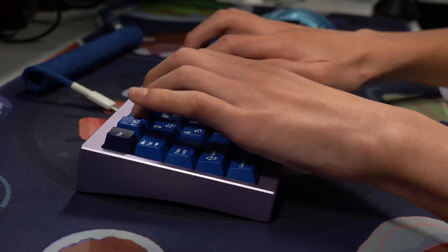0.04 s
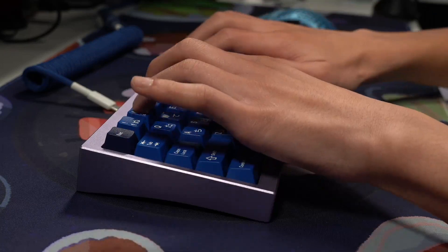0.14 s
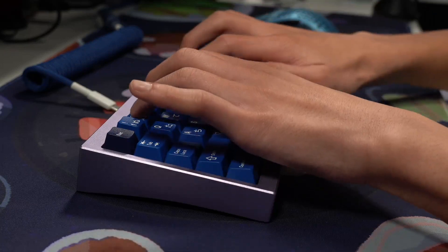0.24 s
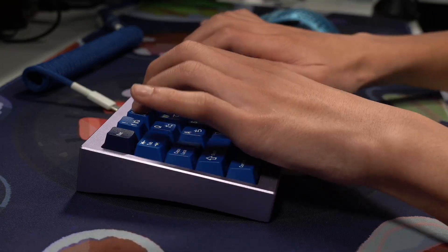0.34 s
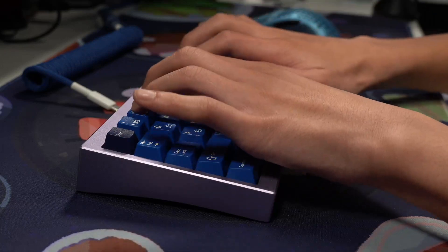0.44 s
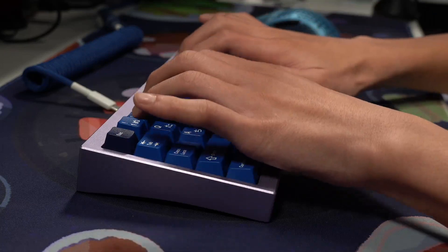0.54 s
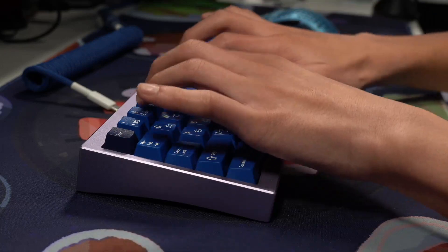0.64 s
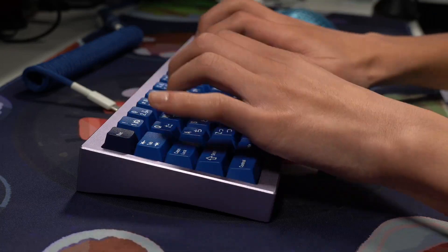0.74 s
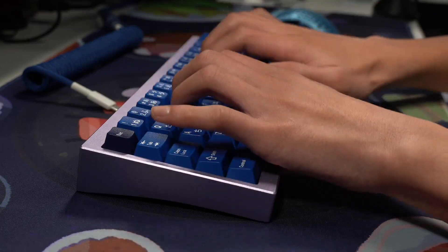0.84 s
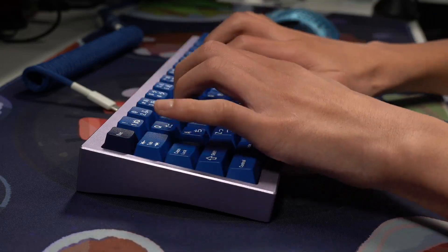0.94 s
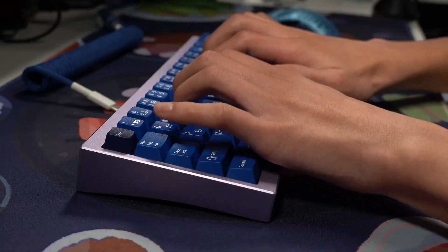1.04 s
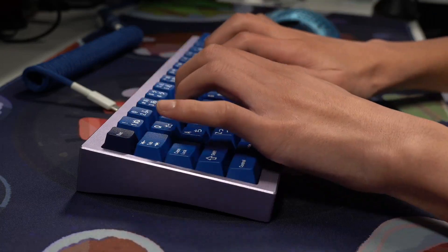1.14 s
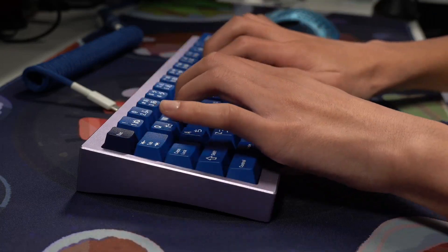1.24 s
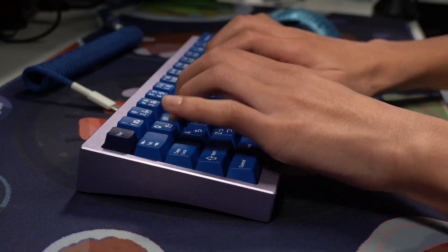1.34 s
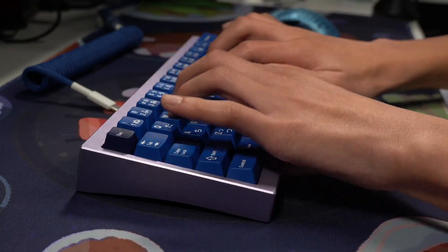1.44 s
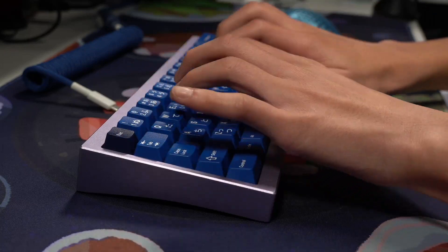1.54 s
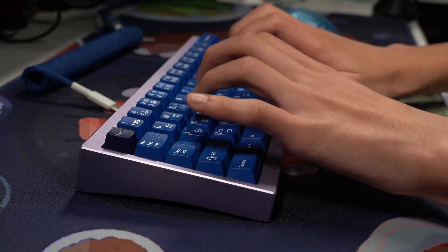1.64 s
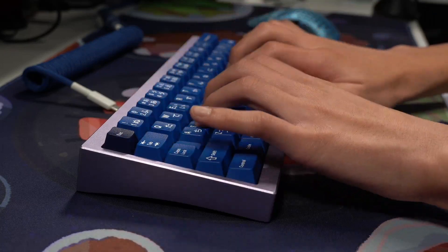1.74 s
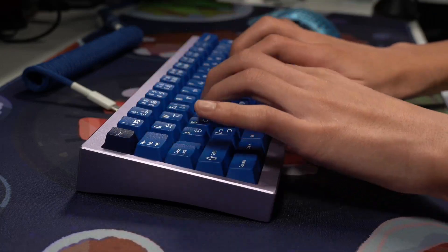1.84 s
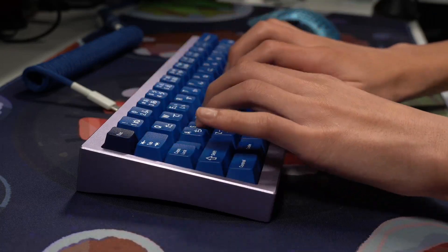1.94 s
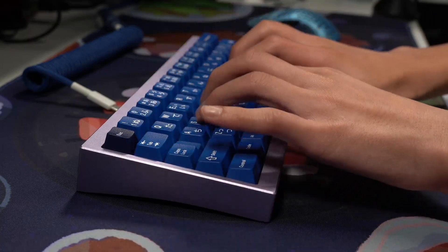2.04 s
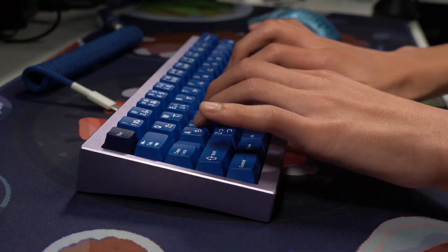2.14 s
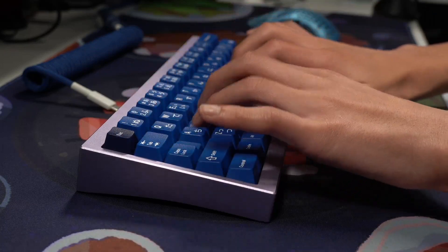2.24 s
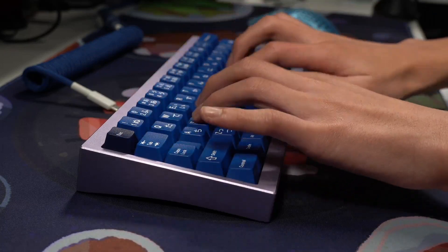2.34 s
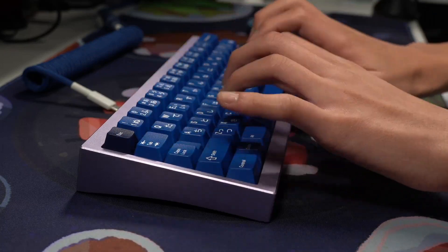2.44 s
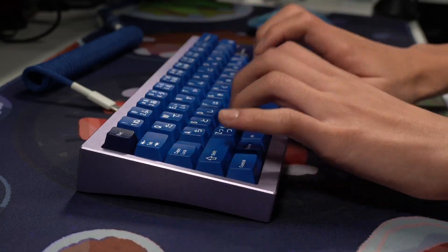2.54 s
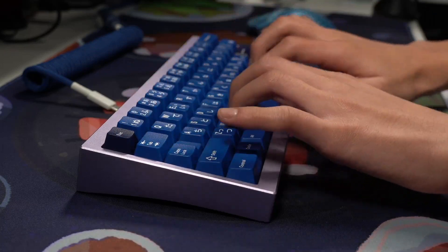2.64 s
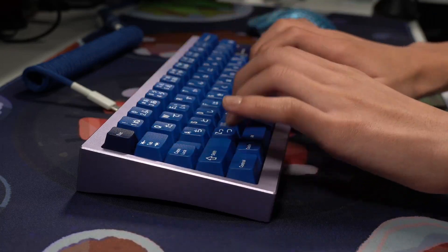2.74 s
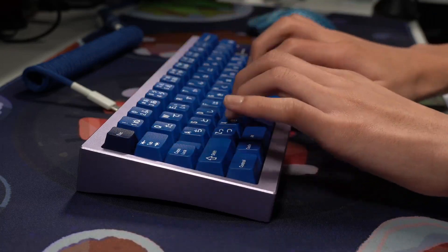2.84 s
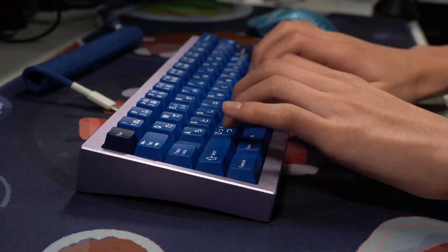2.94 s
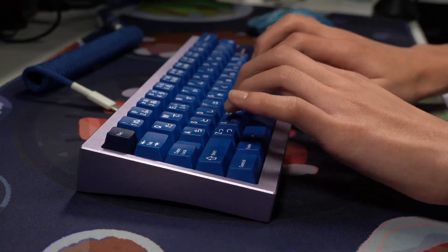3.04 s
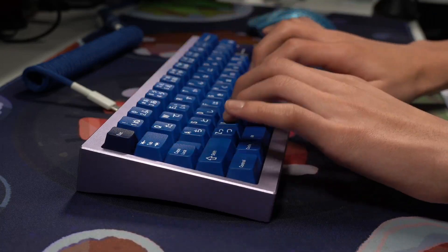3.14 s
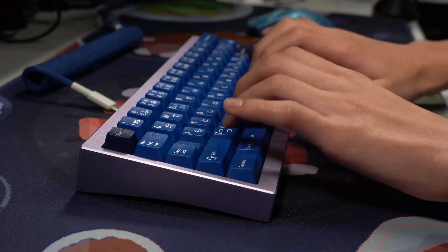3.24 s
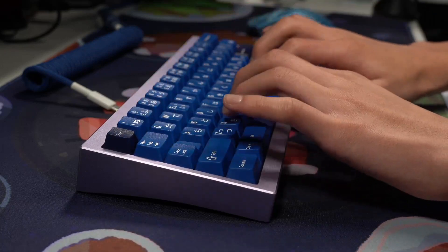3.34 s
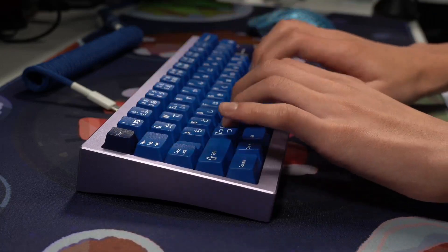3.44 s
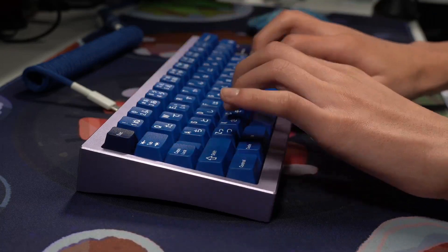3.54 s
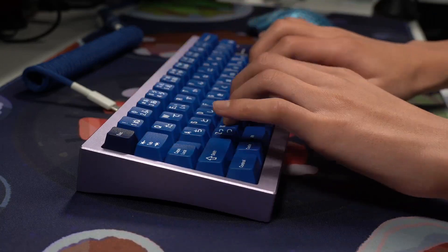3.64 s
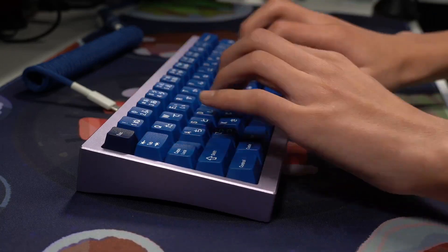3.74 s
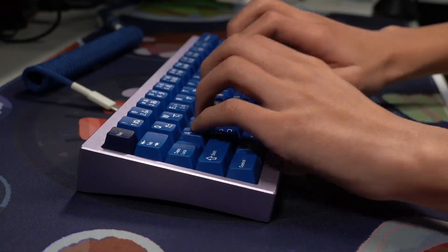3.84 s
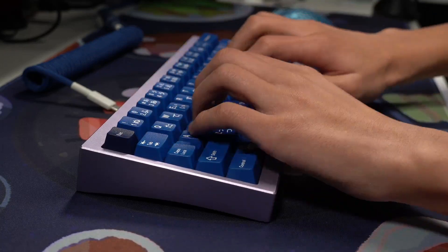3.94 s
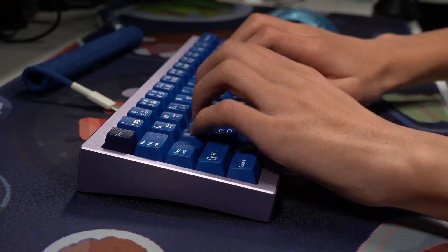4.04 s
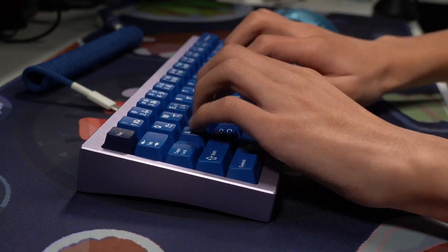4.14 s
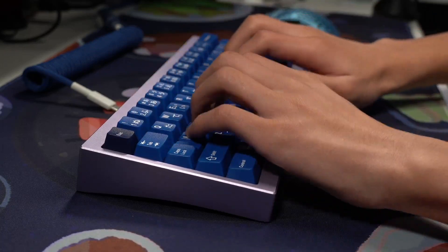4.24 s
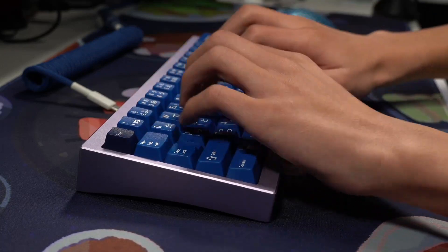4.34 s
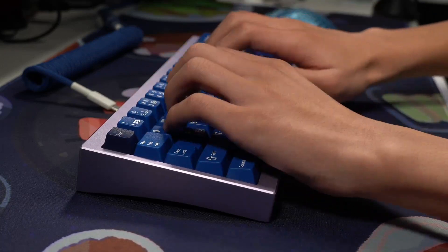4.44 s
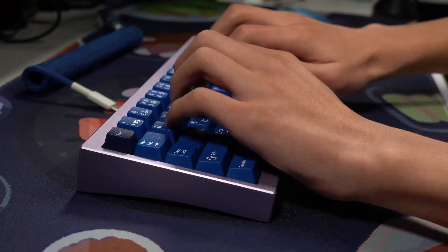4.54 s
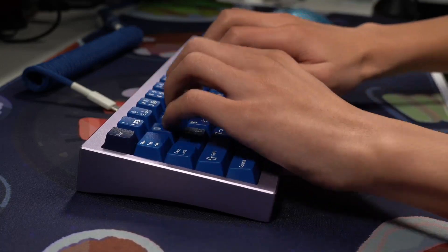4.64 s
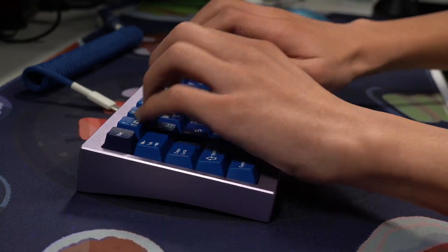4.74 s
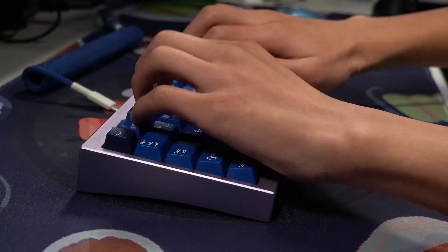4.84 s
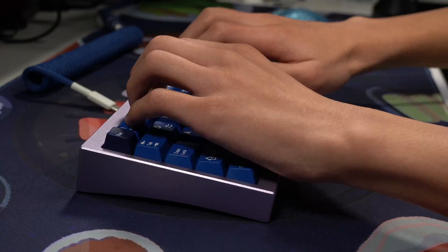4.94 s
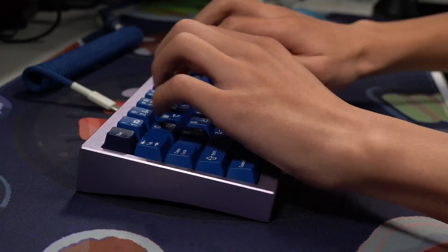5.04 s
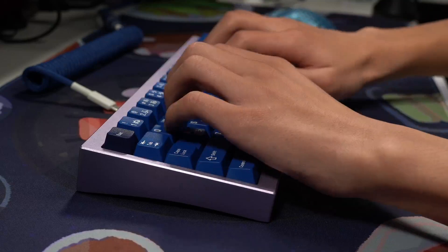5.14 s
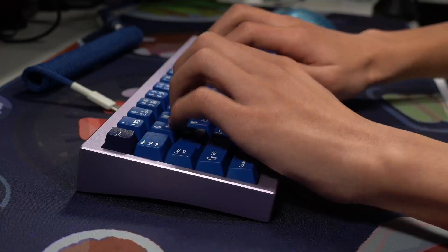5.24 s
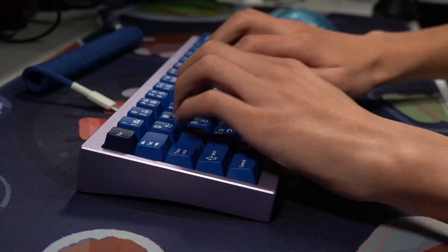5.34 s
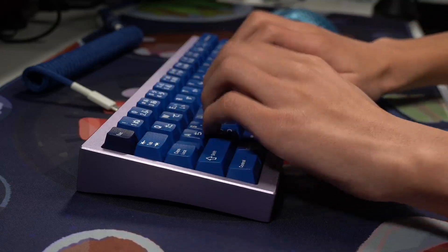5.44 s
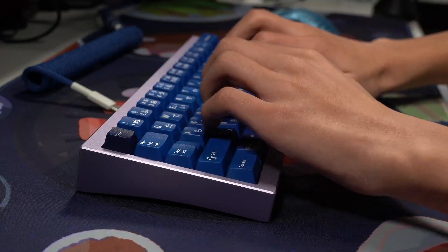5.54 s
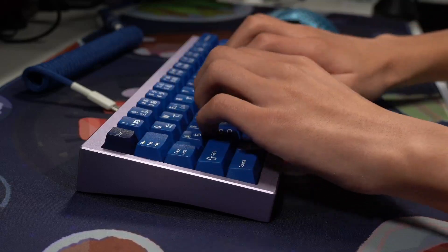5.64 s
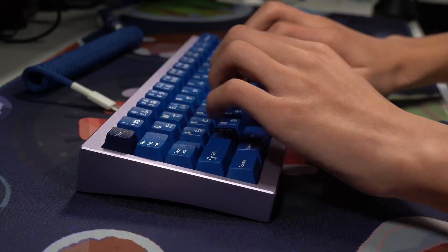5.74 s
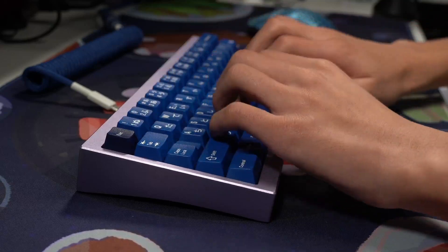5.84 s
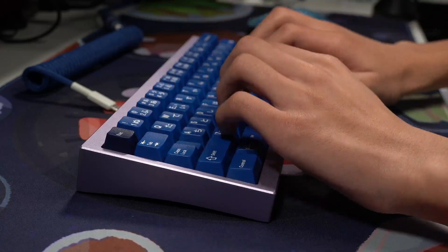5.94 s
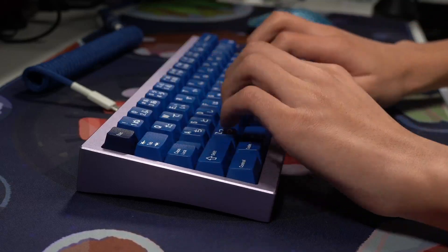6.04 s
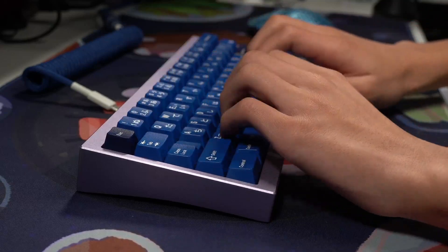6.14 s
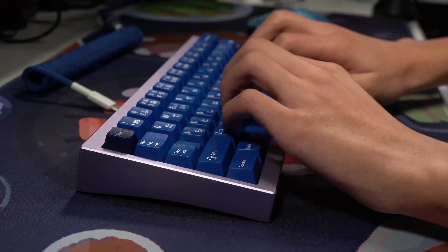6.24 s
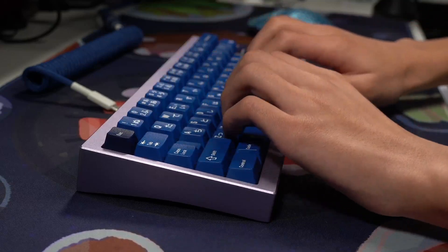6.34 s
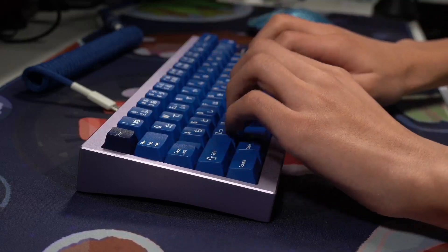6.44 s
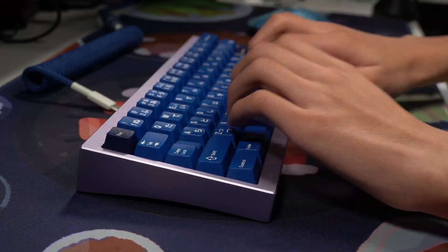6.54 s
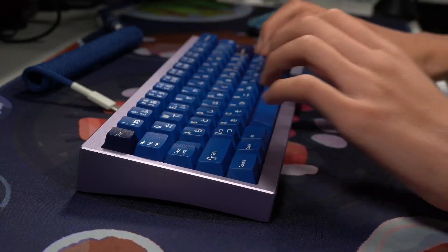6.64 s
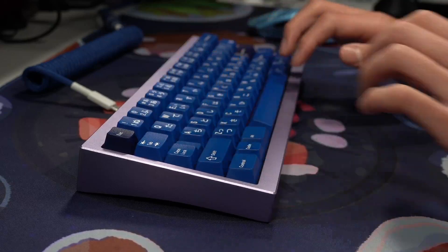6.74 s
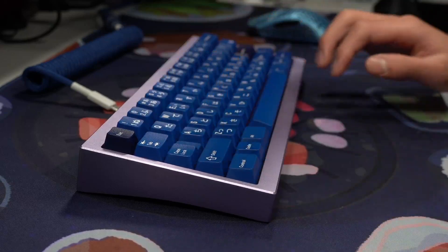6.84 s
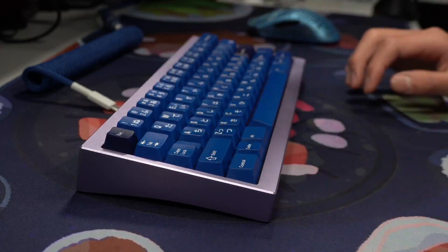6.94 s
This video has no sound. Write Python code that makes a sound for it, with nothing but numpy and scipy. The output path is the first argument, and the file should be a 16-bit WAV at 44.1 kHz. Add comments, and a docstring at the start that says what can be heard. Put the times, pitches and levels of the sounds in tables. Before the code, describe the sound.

Close-up rapid keystrokes clatter on a metal-cased mechanical keyboard, with low desk thumps beneath, then stop as the hands lift away.

```python
"""Fast typing on a mechanical keyboard in a metal case on a desk mat, over steady faint hum and room air.
Hard, bright presses mix with softer, hollow releases and light taps: blows ringing plate, cap and stem modes.
Key colour changes as the hands move over the board. Loose caps tick; case and room add decaying noise tails.
Presses boom the desk as decaying sines, releases less; sliding and rocking are shaped noise.
A soft noise rustle swells at the end as the hands leave the keys."""
import sys
import numpy as np
from scipy import signal
from scipy.fft import rfft, irfft
from scipy.io import wavfile
from scipy.ndimage import uniform_filter1d

SR = 44100
rng = np.random.default_rng(int(sys.argv[2]) if len(sys.argv) > 2 else 0)


def unload_audio(sound):
    """Save the sound as a 16-bit wav file, at the path given as the first command line argument."""
    columns = np.transpose(np.atleast_2d(sound))
    # keep every value between -1 and 1, then stretch to whole-number steps
    steps = np.round(np.clip(columns, -1, 1) * 32767)
    wavfile.write(sys.argv[1], SR, steps.astype(np.int16))


N = 308259
TIME_S = np.arange(N) / SR

# room air: (frequency [Hz], relative density [dB per Hz])
AIR = [(10, -25.5), (30, -2.5), (70, -1.5), (105, -10.5), (290, -10.5), (650, -28.5), (1500, -35),
       (4000, -43)]
# steady hum: (frequency [Hz], rms level [dB])
HUM = [(96.9, -57), (113.8, -57), (150.9, -61), (263.8, -68), (318.6, -62), (425.8, -72), (560.4, -68),
       (963, -72)]
# fingers sliding on caps, stems in housings: (frequency [Hz], relative density [dB per Hz])
RUB = [(500, -9), (1200, -3), (2900, 0), (4500, -5), (8000, -17), (11000, -14), (13000, -23)]
# case rocking on its mat: (frequency [Hz], relative density [dB per Hz])
ROCK = [(15, -14.5), (36, 2.5), (230, -7.5), (900, -46.5)]
# keys under the fingers: (from time [s], plate [Hz], cap [Hz], cap wall [Hz], stem [Hz],
# plate [dB re cap], cap wall [dB re cap], stem [dB re cap])
KEYS = [(0.0, 1115, 2570, 3300, 12700, -5, -10.5, -10), (0.68, 1360, 2860, 3545, 11100, -10.5, -5, -7),
        (1.55, 1970, 2950, 3620, 10600, -4.5, -6.5, -7.5), (2.4, 1530, 2550, 3120, 11230, -0.5, 3.5, -0.5),
        (3.7, 1720, 3700, 2890, 10760, -3.5, 3.5, -2), (4.3, 1330, 2720, 3570, 11100, -14.5, -10, -11),
        (4.65, 950, 2370, 2910, 12200, -6.5, -27, -12.5), (4.99, 1200, 2650, 3740, 10950, -9, -8, -6.5),
        (5.33, 1620, 2700, 2790, 10540, -10, 7.5, -1.5), (5.68, 1470, 2570, 2830, 11200, 6, 12, 5.5)]
# resonance widths at average force: plate, cap, cap wall, stem [Hz]
WIDTHS_HZ = [425, 600, 1100, 800]
# colour of a plastic-on-plastic blow: (frequency [Hz], level [dB])
BLOW = [(100, -23), (700, 0), (2000, 5), (4500, 3.5), (7000, 0.5), (11000, -3), (12700, -7), (15000, -7)]
# hollow clacks, mostly caps springing back on their top stop:
# (time [s], level over 3 ms [dB], hollowness: extra plate sound, capped at 10 in the colour [dB])
RELEASES = [(0.022, -24, 6.5), (0.1779, -18, -4), (0.3603, -19.0, 0.5), (0.5386, -25, 10),
            (0.5654, -24, -4), (0.582, -25.5, -0.5), (0.7328, -19.5, -10.5), (0.8214, -26, 5),
            (0.9156, -20, -2), (1.0539, -22, -0.5), (1.0694, -23.5, 2), (1.097, -16.5, -1),
            (1.2345, -22, 1), (1.2791, -13, 0), (1.3695, -19, 4.5), (1.3993, -24.5, 6), (1.6315, -18.5, -2),
            (1.7327, -24.5, 17.5), (1.8284, -13, 1), (1.9087, -23.5, 6), (2.0048, -16.5, -1),
            (2.0542, -26, 1), (2.0858, -24, 9.5), (2.1919, -21.5, -1), (2.2283, -25.5, 6),
            (2.2412, -24.5, 2), (2.5539, -18, 12), (2.5757, -19.5, 6), (2.6193, -25.5, 4), (2.7218, -17, 5),
            (2.7827, -24.5, 12), (2.8944, -21.5, 1), (2.9136, -20.5, 16), (2.9504, -23.5, 7.5),
            (3.0395, -17, 1), (3.052, -17, 2), (3.1092, -26.5, 16), (3.118, -32, -9), (3.2229, -16.5, 5.5),
            (3.2362, -26, 10), (3.2855, -25, 5), (3.2945, -23.5, 6), (3.451, -23.5, 7), (3.5683, -24, 26),
            (3.5945, -20.5, 0.5), (3.6319, -27.5, 14), (3.639, -20, -5), (3.9269, -24.0, 1),
            (3.998, -23.5, -4), (4.0364, -19, -2), (4.0543, -19.5, 4.5), (4.216, -20, 2),
            (4.2243, -21.5, 9), (4.2377, -20.5, 5), (4.3293, -19.5, 6), (4.3418, -16, 1),
            (4.4372, -20.5, 5.5), (4.585, -20.5, 10), (4.6049, -23.5, -6), (4.773, -19.5, 4.5),
            (4.8178, -22.5, 1.5), (4.9092, -19.5, 9.5), (5.1034, -17.5, 7.5), (5.1342, -21, -3),
            (5.1908, -19, -3.5), (5.2489, -18.5, 2.5), (5.364, -18, 14), (5.37, -19, 11.5),
            (5.5861, -20, 0), (5.6022, -17.5, 15), (5.7191, -14, 4), (5.7347, -14.5, -7),
            (5.796, -19.5, 8.5), (5.9226, -23.5, 15), (5.9994, -28.5, 4), (6.1191, -18.5, 12),
            (6.2966, -24, 11), (6.4846, -25, 0)]
# fingertips tapping caps between strokes: (time [s], level over 3 ms [dB])
TOUCHES = [(0.067, -34.5), (0.209, -32.5), (0.239, -35), (0.697, -45.5), (0.88, -27), (1.012, -33),
           (1.185, -24.5), (1.684, -29.5), (1.925, -29.5), (1.965, -24.5), (2.747, -24), (2.796, -27),
           (3.065, -24), (3.084, -27), (3.249, -29), (3.414, -21.5), (3.471, -29.5), (3.73, -32.5),
           (3.773, -28), (3.822, -28), (3.893, -22), (4.302, -51), (4.415, -23), (4.454, -24.5),
           (4.72, -28), (5.451, -22.5), (5.816, -24), (6.017, -27.5), (6.177, -29), (6.195, -29),
           (6.343, -31), (6.357, -29.5), (6.452, -23.5)]
# hard clacks of keys bottoming out: (time [s], level over 3 ms [dB])
PRESSES = [(0.1015, -15), (0.1039, -17.5), (0.1898, -21.5), (0.2953, -19.5), (0.3351, -20), (0.405, -21),
           (0.4608, -18.0), (0.4888, -17), (0.724, -20.5), (0.7537, -15.5), (0.7861, -15.0),
           (0.9246, -20.5), (0.979, -13), (0.9836, -15.5), (1.0871, -31), (1.102, -19), (1.1432, -12.5),
           (1.1565, -12), (1.2652, -15.0), (1.2823, -14.5), (1.3248, -10.5), (1.3311, -13), (1.4176, -18.5),
           (1.6009, -24.5), (1.6228, -9.5), (1.6437, -6.5), (1.705, -17.5), (1.7766, -13.5), (1.8064, -15),
           (1.8354, -12), (1.8379, -19.5), (1.8728, -17.5), (1.9487, -13.0), (1.9772, -14.5), (2.0087, -16),
           (2.0223, -17.0), (2.0773, -22.5), (2.1378, -16), (2.1605, -12), (2.1776, -8.5), (2.2726, -17.5),
           (2.2926, -19.5), (2.4562, -21.0), (2.4722, -17.5), (2.4838, -13.5), (2.4969, -12.5),
           (2.6568, -18), (2.6696, -17.5), (2.6829, -15), (2.6885, -12), (2.8218, -15.0), (2.8558, -13),
           (2.8604, -15.5), (2.9993, -14.5), (3.0185, -15.0), (3.1651, -17.5), (3.1739, -15),
           (3.1805, -16.5), (3.2141, -14.5), (3.3259, -14.5), (3.3378, -13), (3.3483, -21), (3.3877, -15),
           (3.3897, -14.5), (3.4992, -14), (3.5186, -14), (3.5546, -14.5), (3.7874, -16.5), (3.8032, -13.5),
           (3.8373, -10.5), (3.8637, -20), (3.9705, -22.5), (3.9785, -15.5), (3.9888, -17), (4.016, -15.5),
           (4.0203, -21), (4.1235, -12.5), (4.1389, -11.5), (4.1441, -13.0), (4.149, -22.5), (4.1556, -12),
           (4.2018, -20.5), (4.2506, -25.5), (4.3475, -16), (4.3504, -14), (4.3571, -13.5), (4.397, -17.5),
           (4.5044, -7.5), (4.5115, -21), (4.5188, -9.5), (4.5403, -25.5), (4.5742, -16.0), (4.5918, -18.0),
           (4.688, -13.5), (4.6967, -13.5), (4.7413, -13), (4.7812, -23.0), (4.8577, -12), (4.8621, -20),
           (4.9168, -20.5), (4.9426, -21.5), (5.0226, -13), (5.0251, -5), (5.0359, -6.5), (5.0502, -5),
           (5.1864, -13.5), (5.1952, -12), (5.1988, -13.5), (5.2052, -17.5), (5.2191, -11.0),
           (5.2585, -17.5), (5.2883, -21.5), (5.3589, -8.5), (5.3748, -17.5), (5.3777, -10.0),
           (5.3841, -8.5), (5.4354, -15.5), (5.4907, -21), (5.5308, -13), (5.5338, -10), (5.5514, -17.5),
           (5.5621, -23.5), (5.6181, -22.5), (5.6346, -26.5), (5.7248, -25), (5.7283, -10.5),
           (5.7372, -19.0), (5.7498, -12.0), (5.8304, -18.5), (5.8951, -20.5), (5.9442, -19),
           (6.037, -19.0), (6.0455, -19), (6.0482, -13), (6.2163, -15.5), (6.2307, -16), (6.2368, -17),
           (6.2861, -18.5), (6.3938, -11.5), (6.3994, -13.0), (6.4203, -17.5), (6.4643, -25)]
# ring of the metal case: (frequency [Hz], t60 [s])
CASE = [(800, 0.023), (2800, 0.0067), (6000, 0.0099), (12000, 0.0084)]
# ring of the room: (frequency [Hz], t60 [s])
ROOM = [(300, 0.2), (2500, 0.2), (12000, 0.2)]
# modes of the desk: (frequency [Hz], relative level [dB], t60 [s])
DESK = [(75.5, -7, 0.11), (95.1, -3, 0.18), (110.3, -1, 0.09), (159, -17, 0.056), (220, -16.5, .08),
        (247.5, -13, 0.11)]
# how heavily the hands land: (time [s], desk thump re an average press clack [dB])
WEIGHT = [(0.1, -17), (0.9, -18.5), (1.35, -28), (1.65, -16.5), (2.2, -16), (2.55, -12.5), (3.45, -11),
          (3.85, -16), (4.4, -15.5), (5.0, -19.5), (5.5, -13), (6.1, -15.5), (6.45, -11.5)]
# hands leaving the keys: (time [s], share of full rustle [0-1])
LIFT = [(6.78, 0), (6.89, 1), (6.99, .9)]
# rustle colour: (frequency [Hz], relative density [dB per Hz])
RUSTLE = [(100, 2), (700, -4), (1700, -2), (8000, -17)]

AIR_DB, LIFT_DB = -50, -65  # rms levels; LIFT_DB at full rustle
AVERAGE_DB = -17  # reference stroke
PRESS_HOLLOW_DB, TOUCH_HOLLOW_DB, HOLLOW_SPREAD_DB = -5, 2.0, 0.5
HOLLOW_PER_DB = -0.17  # softer blows are hollower
EDGE_HZ = 16500


def gain_of(db):
    """Decibels to amplitude."""
    return 10 ** (np.asarray(db) / 20)


def evened(x):
    """Scales to rms 1."""
    return x / np.sqrt(np.mean(x ** 2) + 1e-20)


def read(points, hz):
    """Reads a spectrum table on a log-frequency axis."""
    f, value = np.transpose(points)
    return np.interp(np.log(hz + 1), np.log(f + 1), value)


def add(mix, start_s, sound):
    """Mixes a sound in at start_s."""
    part = mix[max(round(start_s * SR), 0):][:len(sound)]
    part += sound[:len(part)]


def noise(colour):
    """Steady noise of a given colour, rms 1."""
    spectrum = rfft(rng.standard_normal(N))
    spectrum *= gain_of(read(colour, np.fft.rfftfreq(N, 1 / SR)))
    return evened(irfft(spectrum, N))


def background():
    """Room air as shaped noise, hum as steady sines."""
    out = gain_of(AIR_DB) * noise(AIR)
    for hz, db in HUM:
        out += gain_of(db) * np.sqrt(2) * np.sin(2 * np.pi * (hz * TIME_S + rng.random()))
    return out


def rub(strokes, level_db=-46, rumble_db=-42, reach_s=0.029, grain_db=5.5):
    """Busy fingers slide on the caps and rock the case on its mat: noise that follows the strokes."""
    busy = np.zeros(N)
    window = np.hanning(int(2 * reach_s * SR))
    for s, db, _ in strokes:
        add(busy, s - reach_s / 2, gain_of(db) * window)
    pressure = np.sqrt(busy)
    # skin catches and lets go
    slips = uniform_filter1d(rng.standard_normal(N), size=300)
    slips = evened(uniform_filter1d(slips, size=120))
    sliding = evened(pressure * gain_of(grain_db * slips) * noise(RUB))
    rocking = evened(np.sqrt(pressure) * noise(ROCK))
    return gain_of(level_db) * sliding + gain_of(rumble_db) * rocking


def blows(rows, hollow_db):
    """Adds hollowness to (time, level) rows: the softer a blow, the more of it is the plate's tock."""
    s, level_db = np.transpose(rows)
    hollow = hollow_db + HOLLOW_PER_DB * (level_db - AVERAGE_DB)
    hollow = hollow + HOLLOW_SPREAD_DB * rng.standard_normal(len(s))
    return np.column_stack([s, level_db, hollow])


def struck(db):
    """Minimum-phase impulse responses of energy 1, one per row of a dB spectrum."""
    cepstrum = irfft(db * np.log(10) / 20)
    half = cepstrum.shape[1] // 2
    # fold onto positive time: makes the ring causal
    cepstrum[:, 1:half] *= 2
    cepstrum[:, half + 1:] = 0
    ring = irfft(np.exp(rfft(cepstrum)))[:, :half]
    return ring / np.linalg.norm(ring, axis=1, keepdims=True)


def chatter(rings, hollow_db, bounce_db=-9, looseness=0.62, span_s=.0018, count=3):
    """A cap rebounds a few times within milliseconds, more strongly in hollow clacks; energy stays 1."""
    when, size = np.moveaxis(rng.random((len(rings), 2, count)), 1, 0)
    height = np.minimum(gain_of(bounce_db + looseness * hollow_db), .5)[:, None] * (size + .5)
    out = rings.copy()
    for k in range(count):
        late = np.round(span_s * SR * (k + .5 + when[:, k]) / count).astype(int)
        at = np.arange(rings.shape[1]) - late[:, None]
        delayed = np.take_along_axis(rings, np.maximum(at, 0), axis=1) * (at >= 0)
        out += height[:, [k]] / (k + 1) * delayed
    return out / np.linalg.norm(out, axis=1, keepdims=True)


def clacks(rows, detune=0.049, treble_spread_db=4.5, hardness=0.35, hollow_hz=1900, hard_hz=3300,
           soft_damping=0.0084, size=2048):
    """Blows ring plate, cap, cap wall and stem; hard ones are brighter and shorter, no two alike."""
    s, level_db, hollow_db = np.transpose(rows)
    keys = np.array(KEYS)
    key = keys[np.maximum(np.searchsorted(keys[:, 0], s) - 1, 0)]
    hz = np.fft.rfftfreq(size, 1 / SR) + 1
    chance = rng.standard_normal((len(s), len(hz)))
    force_db = (level_db - AVERAGE_DB)[:, None]
    mode_db = np.insert(key[:, 5:], 1, 0, axis=1)  # cap at 0 dB
    power = 0
    for k, width_hz in enumerate(WIDTHS_HZ):
        centre_hz = key[:, [k + 1]] * (1 + detune * chance[:, [k]])
        damping_hz = width_hz * np.exp(soft_damping * force_db)
        offset = (hz ** 2 - centre_hz ** 2) / (hz * damping_hz)
        power = power + gain_of(mode_db[:, [k]]) ** 2 / (1 + offset ** 2)
    db = 10 * np.log10(power) + read(BLOW, hz)
    db += np.minimum(hollow_db, 10)[:, None] / (1 + (hz / hollow_hz) ** 6)
    treble_db = hardness * force_db + treble_spread_db * chance[:, [-1]]
    db += treble_db * (1 - 1 / (1 + (hz / hard_hz) ** 2) ** 2)
    # the spot hit favours some of the many small modes
    ripple_db = np.interp(hz, [3000, 8000], [2.3, 3.6])
    ripple = uniform_filter1d(chance, size=18, axis=1)
    db += ripple_db * evened(uniform_filter1d(ripple, size=12, axis=1))
    rings = chatter(struck(db), hollow_db) * np.sqrt(.003 * SR)  # rms 1 over 3 ms
    out = np.zeros(N)
    for start_s, gain, ring in zip(s, gain_of(level_db), rings):
        add(out, start_s, gain * ring)
    return out


def rattles(strokes, count=3, level_db=-38, spread_db=4.5, follow=0.29, looseness=0.65,
            lag_s=.0035, scatter_s=0.005):
    """Loose caps tick in a quick cluster around each clack, louder the hollower it is."""
    s, clack_db, hollow_db = np.repeat(strokes, count, axis=0).T
    when, size = rng.standard_normal((len(s), 2)).T
    db = level_db + follow * (clack_db - clack_db.mean()) + looseness * hollow_db
    db = db + spread_db * np.minimum(size, 1)
    tick_s = s + lag_s + scatter_s * np.clip(when, -2, 2)
    return clacks(np.column_stack([tick_s, db, hollow_db / 2]))


def diffuse(x, decays, delay_s, count=3):
    """Dense decaying reflections: noise tails, their shares turning steadily over time."""
    out = np.zeros(N)
    for k in range(count):
        hz, t, z = signal.stft(rng.standard_normal(SR // 3), SR, nperseg=128)
        decay = gain_of(-60 * t / read(decays, hz)[:, None])
        tail = signal.istft(z * decay, SR)[1]
        tail *= 1 - np.exp(-(np.arange(len(tail)) / SR / delay_s) ** 2)  # gradual onset
        share = np.cos(np.pi * (2 * np.pi * TIME_S + k / count)) * np.sqrt(2 / count)
        out += signal.oaconvolve(x * share, tail / np.linalg.norm(tail))[:N]
    return out


def desk(presses, releases, follow=0.78, release_db=-3.0, spread_db=8.0, rise_s=0.0053):
    """Presses boom the desk modes, the more the heavier the hands land; releases push less."""
    t = np.arange(SR // 3) / SR
    hz, db, t60_s = np.transpose(DESK)[:, :, None]
    modes = gain_of(db - 60 * t / t60_s) * np.sin(2 * np.pi * hz * t)
    modes *= 1 - np.exp(-t / rise_s)
    out = np.zeros(N)
    for rows, kind_db in ((presses, 0), (releases, release_db)):
        s, clack_db, _ = rows.T
        push_db = AVERAGE_DB + follow * (clack_db - AVERAGE_DB) + kind_db
        push_db = push_db + np.interp(s, *np.transpose(WEIGHT))
        chance = rng.standard_normal((len(s), len(DESK)))
        for start_s, level_db, shares in zip(s, push_db, chance):
            mode_gains = gain_of(level_db + spread_db * np.clip(shares, -1, 1))
            add(out, start_s, mode_gains @ modes)
    return out


def hands_lift():
    """Shaped noise: a soft rustle swells as the hands leave the keys."""
    return gain_of(LIFT_DB) * np.interp(TIME_S, *np.transpose(LIFT)) * noise(RUSTLE)


def scene(keys_db=0.0, case_db=-12, room_db=-22):
    """Keys, their ring in case and room, desk, rubbing, rustle and background."""
    presses = blows(PRESSES, PRESS_HOLLOW_DB)
    releases = np.array(RELEASES)
    touches = blows(TOUCHES, TOUCH_HOLLOW_DB)
    strokes = np.vstack([presses, releases, touches])
    keys = gain_of(keys_db) * clacks(strokes) + rattles(strokes)
    keys = keys + gain_of(case_db) * diffuse(keys, CASE, delay_s=0.0039)
    room = gain_of(room_db) * diffuse(keys, ROOM, delay_s=.006)
    hands = rub(strokes) + hands_lift()
    return (keys + room + desk(presses, releases) + hands + background())[None]


def record(dry):
    """Clips peaks just under full scale, then limits the band."""
    clipped = np.clip(dry, -.88, .88)
    lowpass = signal.firwin(255, EDGE_HZ, window=("kaiser", 9), fs=SR)
    return signal.oaconvolve(clipped, lowpass[None], "same")


dry = scene()
out = record(dry)
unload_audio(out)
```